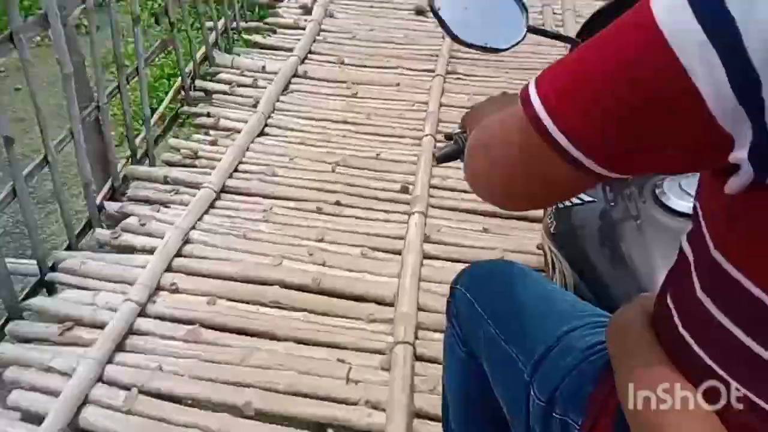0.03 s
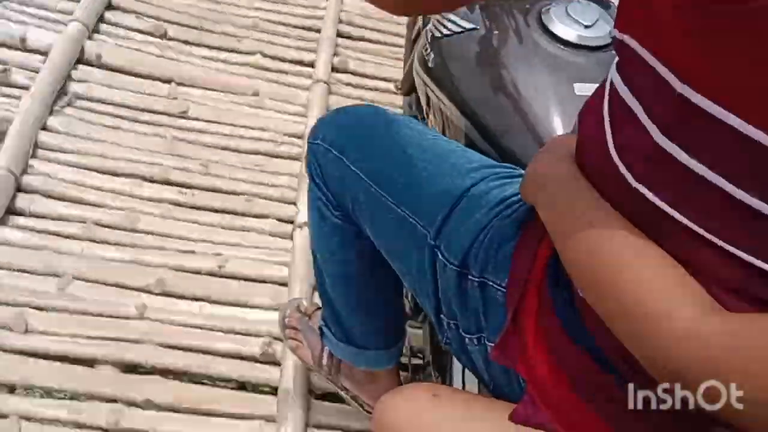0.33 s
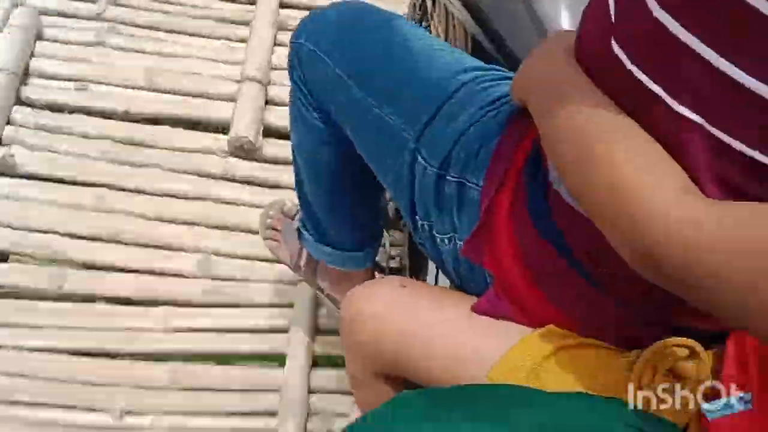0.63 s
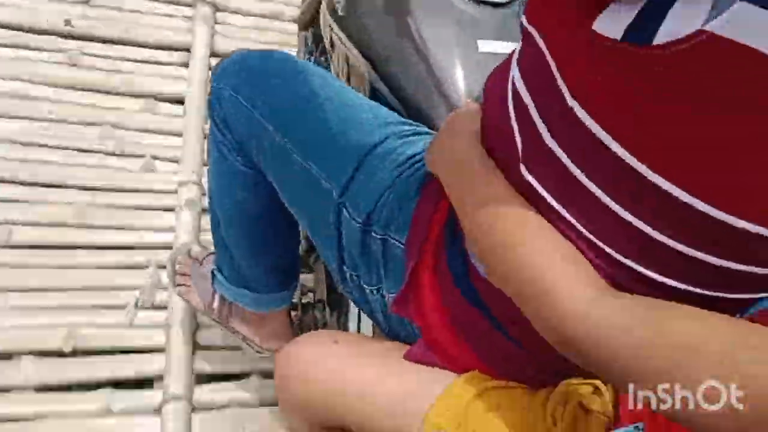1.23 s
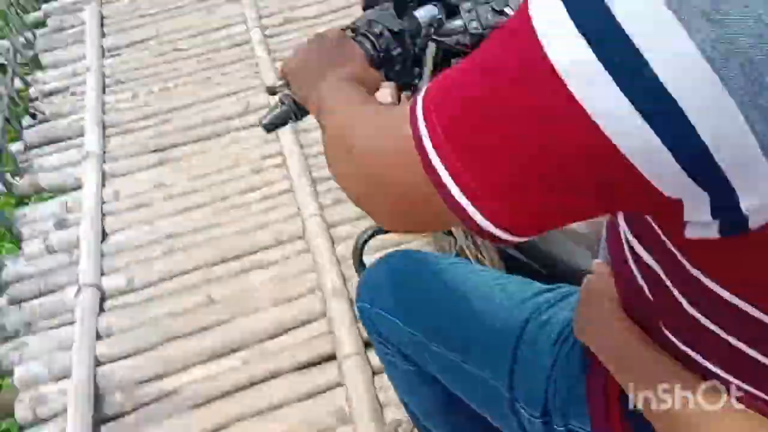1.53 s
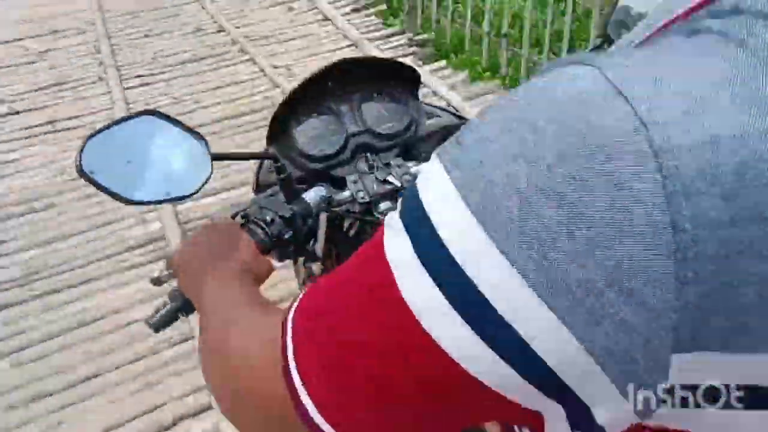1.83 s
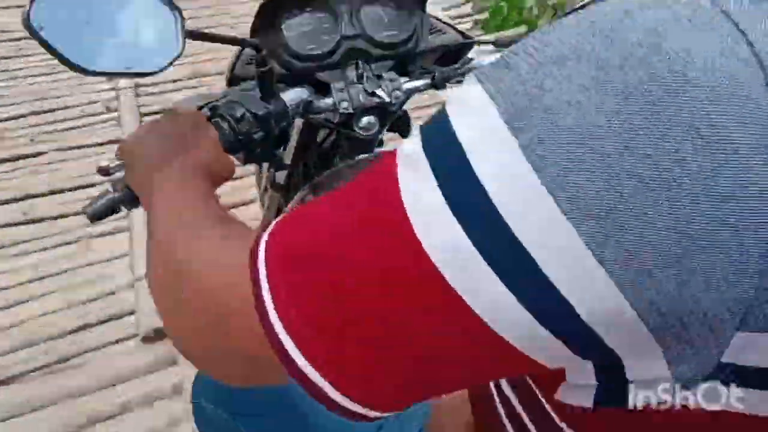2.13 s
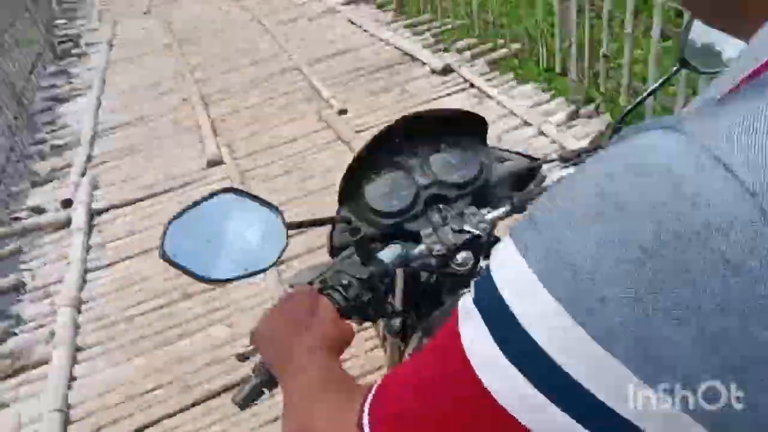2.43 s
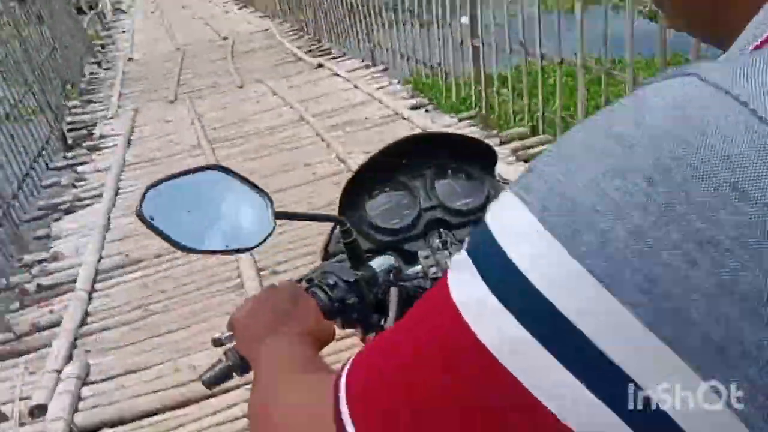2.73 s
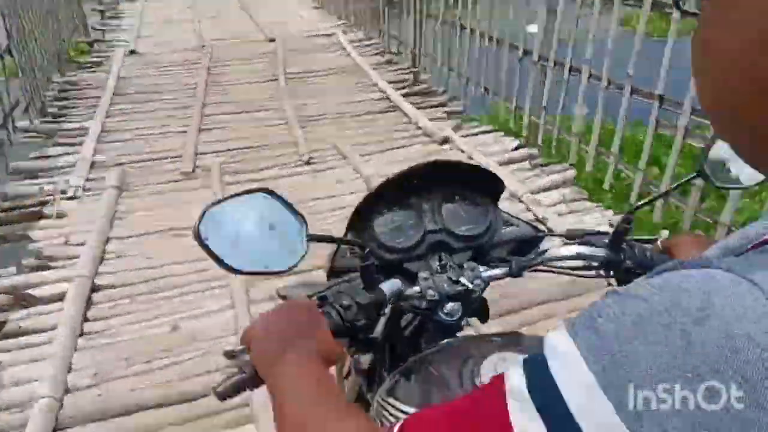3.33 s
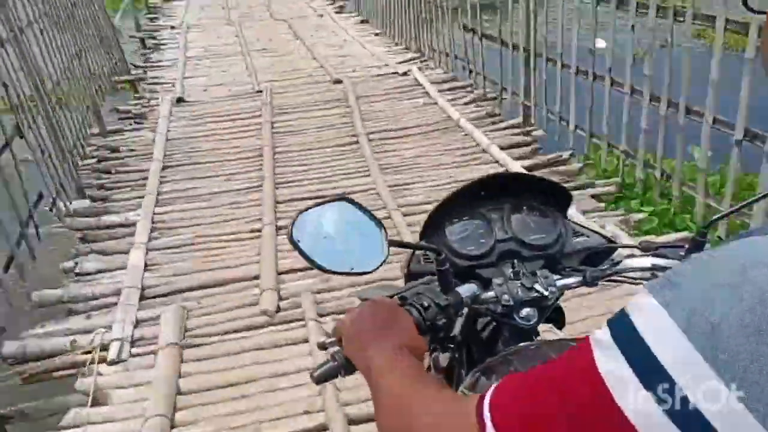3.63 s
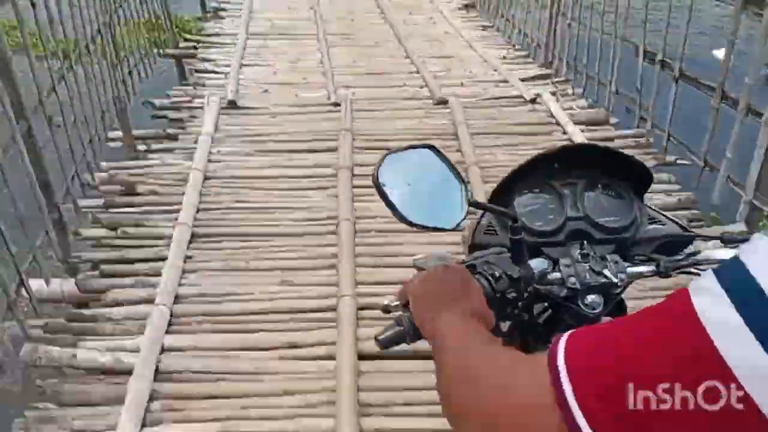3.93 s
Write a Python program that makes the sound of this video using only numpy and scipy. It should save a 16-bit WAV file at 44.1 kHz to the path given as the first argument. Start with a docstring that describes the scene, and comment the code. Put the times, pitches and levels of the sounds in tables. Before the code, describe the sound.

Loose bamboo slats clatter and knock under a slow motorcycle, with wind buffeting the microphone.

```python
"""Loose bamboo slats knock, chatter and crunch under a slow motorcycle crossing a bridge.
Heard from the pillion seat, they come in two dense spells with single clacks between: each impact
excites damped modes of the canes, and bending poles groan as they slip in their lashings.
The engine putters faintly below; after about a second, turbulent wind buffets the microphone."""
import sys
import numpy as np
from scipy import signal
from scipy.fft import rfft, irfft, next_fast_len
from scipy.io import wavfile
from scipy.ndimage import uniform_filter1d, minimum_filter1d, map_coordinates

SR = 44100
rng = np.random.default_rng(int(sys.argv[2]) if len(sys.argv) > 2 else 0)


def log_audio(samples):
    """Write samples as a 16-bit WAV file to the path given in sys.argv[1]."""
    # one column per channel
    frames = np.atleast_2d(samples).T
    # limit to full scale, then quantise
    limited = np.clip(frames, -1, 1)
    pcm = np.round(limited * 32767).astype(np.int16)
    wavfile.write(sys.argv[1], SR, pcm)


N = 176400

# Wind at the microphone. Each row: time in seconds, buffeting and flutter in relative dB.
WIND_LEVELS = [(0.0, -41, -38), (0.17, -47, -36), (0.2, -37, -28), (0.26, -30, -39), (0.52, -33, -25.5),
               (0.56, -41, -42), (0.7, -48, -32), (0.91, -33.5, -30), (0.95, -23, -28.5),
               (1.11, -21.5, -52.5), (1.2, -20, -39), (1.24, -33, -38), (1.31, -10.5, -24),
               (1.38, -28, -24), (1.41, -17, -38), (1.59, -24.5, -26.5), (1.64, -19.5, -7.5),
               (1.69, -17.5, -24), (1.74, -13.5, -9.5), (1.84, -19, -31.5), (1.89, -9, -11),
               (1.93, -19.5, -17), (2.1, -15.5, -14.5), (2.21, -25.5, -18.5), (2.34, -16.5, -25.5),
               (2.39, -31.5, -25.5), (2.53, -26.5, -29.5), (2.64, -20, -25), (2.84, -21, -28),
               (2.99, -36, -31), (3.03, -14.5, -20), (3.1, -12.5, -4.5), (3.14, -13, -22),
               (3.17, -16, -19.5), (3.38, -19.5, -21), (3.52, -20.5, -28), (3.61, -24.5, -19.5),
               (3.66, -4.5, -26), (3.71, -23.5, -27), (3.75, -19.5, -15.5), (3.79, -18, -19.5),
               (3.88, -22.5, -12.5), (3.94, -14.5, -37), (4.0, -27, -37.5)]
# Single eddies. Each row: start in seconds, relative level in dB, pitch in Hz.
EDDIES = [(1.185, -2, 125), (1.311, -18, 143), (1.53, -7.5, 118), (1.62, -0.5, 148), (1.736, -10.5, 189),
          (2.106, -4, 140), (3.039, -4, 75.4), (3.088, 2.5, 225), (3.131, 1, 145), (3.342, -2.5, 95),
          (3.644, 5, 107.4), (3.744, 1, 254)]
# Poles slipping under load. Each row: start in seconds, length in seconds, level in dB, pitch in Hz.
POLE_SLIPS = [(.2, .035, -19, 536), (.364, 0.028, -18, 436), (.43, .1, -17.5, 518.5),
              (1.885, 0.039, -46, 600)]
# Running rattle of the deck. Each row: time in seconds, hollow tone, clack and crunch in relative dB.
RATTLE_LEVELS = [(0.0, -20, -18.5, -37.6), (0.15, -23, -23.5, -26.5), (0.33, -24, -26.5, -41),
                 (0.4, -16.5, -18.5, -33), (0.52, -35, -18.5, -27.5), (0.62, -25, -23.5, -38),
                 (0.76, -17, -18, -22.5), (0.9, -34.5, -30, -43), (1.0, -25, -27, -47),
                 (1.12, -31.5, -33.5, -47), (1.29, -29.5, -33.5, -52.5), (1.42, -26.5, -34.5, -53),
                 (1.56, -32, -31.5, -49), (1.66, -20.5, -26.5, -49), (1.82, -32, -39.5, -58),
                 (1.95, -26.5, -45, -58), (2.07, -40, -37, -53.5), (2.18, -33, -44, -64),
                 (2.29, -18.5, -28.5, -43), (2.42, -34, -37.5, -50), (2.53, -26, -27, -48),
                 (2.58, -18.5, -15, -32), (2.74, -16, -20.5, -30), (2.88, -14.5, -20, -30.5),
                 (2.98, -20.5, -19, -36), (3.03, -23, -28.1, -57), (3.13, -22.5, -39.5, -55),
                 (3.35, -26, -38.5, -53), (3.53, -32.5, -36, -50), (3.8, -26, -33, -50),
                 (3.92, -41, -38.5, -56), (4.0, -35, -29, -40.5)]
# Slats flung against their bearers. Each row: start in seconds, hollow tone, clack and crack
# in relative dB, main note in Hz, settling time in seconds.
SLAT_IMPACTS = [(0.0, -14, -21.8, -16.5, 1624, 0.018), (0.026, -18.5, -16.5, -30.5, 1277, 0.02),
                (0.081, -25, -21.0, -33, 1220, 0.0053), (0.103, -18, -20.5, -30, 1580, 0.0072),
                (0.168, -32, -18.5, -51, 1217, 0.014), (0.184, -23.5, -35, -26.5, 2040, 0.021),
                (0.217, -17.5, -18, -34, 573, 0.028), (0.268, -21.5, -20.5, -30, 1330, 0.02),
                (0.363, -13, -20, -33.5, 523, 0.022), (0.389, -15, -21, -35.5, 534, 0.016),
                (0.428, -18, -22.5, -41, 526, 0.014), (0.45, -23, -19.5, -30, 1620, 0.0099),
                (0.473, -30, -17.5, -59, 1518.0, 0.0061), (0.493, -16, -13, -37.6, 414, 0.016),
                (0.515, -26, -18.5, -41, 1450, 0.007), (0.553, -40, -14, -33, 1683, 0.015),
                (0.578, -24, -22, -24, 1270.0, 0.012), (0.623, -40, -23.5, -41, 1577, 0.023),
                (0.659, -40, -21, -29.5, 1235, 0.0029), (0.675, -21, -22.5, -21, 1260, 0.0078),
                (0.723, -25.5, -22, -34, 2070, 0.007), (0.74, -20, -19.7, -37, 2046.0, 0.018),
                (0.759, -38, -19.5, -43, 1735, 0.013), (0.784, -48, -22, -33.5, 1450, 0.0038),
                (0.842, -25, -18.5, -30, 2045, 0.008), (0.858, -22, -22.3, -34.5, 1870, 0.016),
                (0.916, -30, -27, -58, 1254, 0.01), (0.952, -20, -22, -42.5, 650, 0.026),
                (0.995, -30, -24.0, -48, 1900, 0.005), (1.048, -24, -24.5, -49, 1944, 0.0066),
                (1.083, -30, -27.1, -26, 1647.0, 0.004), (1.15, -25, -25, -32.6, 1757, 0.0097),
                (1.165, -46, -48, -42, 1680, 0.0063), (1.219, -28, -23, -53, 1990, 0.017),
                (1.348, -30, -23.5, -51, 1648, 0.021), (1.374, -24, -27, -50, 1143, 0.01),
                (1.455, -39, -26, -43, 1484, 0.016), (1.481, -22.5, -24.5, -34, 1570, 0.012),
                (1.501, -19.5, -17.5, -35.5, 1567.0, 0.0059), (1.605, -18, -17.5, -45, 1613, 0.016),
                (1.639, -37, -21.5, -60, 1406, 0.017), (1.687, -42.0, -26.5, -49, 1760, 0.017),
                (1.732, -26, -30, -53, 2090, 0.0059), (1.856, -48, -36.5, -49, 1640, 0.0058),
                (1.886, -12.5, -22, -43.5, 610, 0.016), (1.903, -40, -36, -58, 479.0, 0.0038),
                (1.933, -18.5, -26.5, -51.1, 545, 0.017), (2.013, -19, -32, -61, 468.0, 0.018),
                (2.031, -37, -26, -53, 1340, 0.011), (2.1, -24, -27.5, -44, 616, 0.011),
                (2.269, -29.3, -31.5, -40.5, 721.0, 0.021), (2.306, -42.0, -27, -62, 1350, 0.023),
                (2.384, -24.5, -26.5, -42, 595, 0.017), (2.448, -25.5, -19.5, -31.5, 1227, 0.017),
                (2.463, -26, -19.5, -48, 1226, 0.017), (2.545, -23, -21.5, -36.5, 1656, 0.024),
                (2.601, -23.5, -20.5, -39, 1520, 0.024), (2.639, -18.5, -18.2, -39, 943, 0.022),
                (2.709, -18.5, -18, -25.5, 850, 0.023), (2.731, -19, -16.5, -39, 592, 0.011),
                (2.763, -46, -22, -44, 1420, 0.011), (2.842, -37, -41, -34.5, 510, 0.0068),
                (2.924, -21.5, -38, -41.0, 733, 0.023), (3.051, -21, -51, -63, 617, 0.012),
                (3.059, -18.6, -49, -64, 650, 0.016), (3.112, -16, -30.5, -56, 570, 0.015),
                (3.242, -22.5, -31, -46, 804, 0.016), (3.286, -33, -23, -35.5, 1014, 0.015),
                (3.381, -22.5, -30.5, -51, 586, 0.012), (3.455, -28.5, -32.5, -44.5, 464, 0.016),
                (3.618, -17.5, -28, -41, 517, 0.01), (3.644, -17.5, -46, -63, 620, 0.0068),
                (3.678, -21, -23, -36.5, 554, 0.023), (3.73, -35, -22.5, -33.5, 1140, 0.016),
                (3.783, -40, -27, -44.5, 1233, 0.018), (3.806, -20.5, -34, -68, 1230, 0.0069),
                (3.888, -24.5, -28.5, -53.5, 423, 0.0037), (3.925, -35, -37.5, -46.5, 2030, 0.0032),
                (3.955, -25, -29.5, -62, 646, 0.023), (3.98, -22, -26.5, -52, 1270, 0.021)]

# Frequency responses. Each row: frequency in Hz, gain in dB.
EXHAUST_COLOUR = [(25, -39.5), (70, 1), (125, 21), (180, 10.5), (300, 0.5), (600, -7.5), (1500, -30),
                  (6000, -47)]  # the silencer
BUFFET_COLOUR = [(20, -37), (38, -20.5), (55, -16), (80, 0), (125, 0.5), (180, -1), (240, -9), (330, -22.5),
                 (500, -35), (1000, -42.5), (3000, -78)]  # low turbulence
FLUTTER_COLOUR = [(80, -25.5), (160, -3.5), (240, 3.5), (340, 3), (450, -8), (700, -13), (1100, -37.5),
                  (2500, -52), (6000, -75), (12000, -86.5)]  # higher turbulence
PORT_COLOUR = [(15, -28), (40, -14.5), (60, -7.5), (85, 3.5), (400, -3)]  # the microphone port struck by an eddy
HOLLOW_COLOUR = [(120, -33.5), (260, -8), (430, 2), (580, -2.5), (760, -4), (950, -5.5), (1400, -6.5)]  # a cane's tube
CLACK_COLOUR = [(500, -43), (900, -5), (1250, 5.5), (1600, 4), (2100, 0.5), (2500, -5), (3000, -14),
                (4500, -13.5)]  # a slat's clack
CRUNCH_COLOUR = [(1500, -15.5), (2700, 5.5), (3050, -1), (3700, 4.5), (4200, 1), (4600, 4), (5100, -9),
                 (6500, -13), (7200, -10), (8400, -7.5), (9200, -19.5), (10000, -33), (11400, -40),
                 (12500, -46.5), (16000, -51)]  # slats rubbing
CRACK_COLOUR = [(1500, -13.5), (2800, 6), (4400, 5), (5400, -3), (6500, -4.5), (8400, -4.5), (9200, -11.5),
                (10200, -27), (11400, -28), (12500, -39.5), (16000, -46)]  # a flung slat's dry crack

HOLLOW_T60, CLACK_T60, CRACK_T60, NOTE_T60 = 0.055, 0.03, 0.015, 0.059  # seconds to decay by 60 dB
LOAD_RISE_S, TOUCH_S = 0.0025, 0.00036  # a slat takes the load; softness of a contact
SHORTER_POLES_S = (1.53, 2.56)  # over this span long, deep poles give way to shorter ones


def amp(db):
    """Decibels to gain."""
    return 10 ** (np.asarray(db) / 20)


def unit(x):
    """Scale to rms 1."""
    return x / np.sqrt(np.mean(x ** 2) + 1e-20)


def wobble(rate):
    """A smooth random curve, rate knots a second."""
    return map_coordinates(rng.standard_normal(2048), [np.arange(N) * rate / SR], mode="wrap")


def curves(rows):
    """Linear interpolation of each column after the time, one value per sample."""
    times, *columns = np.transpose(rows)
    return [np.interp(np.arange(N) / SR, times, column) for column in columns]


def add(track, start_s, sound):
    """Superpose a sound on a track."""
    i = int(np.clip(start_s * SR, 0, N - 1))
    track[i:i + len(sound)] += sound[:N - i]


def body(colour, size=4096):
    """Minimum-phase impulse response of a colour, by folding its cepstrum."""
    hz, db = np.transpose(colour)
    log_hz = np.log(np.fft.rfftfreq(size, 1 / SR) + 1)
    cepstrum = irfft(np.log(amp(np.interp(log_hz, np.log(hz), db))))
    cepstrum[1:size // 2] *= 2
    cepstrum[size // 2 + 1:] = 0
    return irfft(np.exp(rfft(cepstrum)))


def through(x, response):
    """Convolve x with an impulse response."""
    return signal.fftconvolve(x, response)[:len(x)]


def engine(firing_hz=27.68, level_db=-49):
    """Source and filter: the pulse train of one slow cylinder is shaped by its silencer."""
    cycles = np.cumsum(firing_hz * (1 + .04 * wobble(3))) / SR
    firings = np.diff(np.floor(cycles), prepend=0) * amp(6 * wobble(27))
    return amp(level_db) * unit(through(firings, body(EXHAUST_COLOUR)))


def turbulence(colour):
    """Random pressure fluctuation: coloured noise of rms 1, partly evened out in strength."""
    pressure = unit(through(rng.standard_normal(N), body(colour)))
    local_power = np.abs(uniform_filter1d(pressure ** 2, size=1800))
    return unit(pressure / np.sqrt(local_power + 0.28))


def wind(eddy_rise_s=0.0092):
    """Turbulent pressure buffets and flutters at the microphone; single eddies thump its port."""
    buffet_db, flutter_db = curves(WIND_LEVELS)
    buffet = amp(buffet_db - 1.5) * turbulence(BUFFET_COLOUR)
    flutter = amp(flutter_db - 3.5) * turbulence(FLUTTER_COLOUR)
    thumps, t = np.zeros(N), np.arange(SR // 10) / SR
    swell = (t / eddy_rise_s) ** 2
    for start_s, db, hz in EDDIES:
        add(thumps, start_s, amp(db - 4) * swell * np.exp(1 - swell) * np.sin(2 * np.pi * hz * t))
    return buffet + flutter + through(thumps, body(PORT_COLOUR))


def groans():
    """Friction: a bending pole slips in its lashing and sounds one rough, low note."""
    out = np.zeros(N)
    for start_s, length_s, db, hz in POLE_SLIPS:
        t = np.arange(int(2 * length_s * SR)) / SR
        phase = 2 * np.pi * np.cumsum(hz * (1 + 0.049 * wobble(170)[:len(t)])) / SR
        envelope = (1 - np.exp(-t / 0.0048)) / (1 + (t / length_s) ** 8)
        roughness = amp(1.9 * wobble(120)[:len(t)])
        add(out, start_s, amp(db) * envelope * roughness * np.sin(phase))
    return out


def contacts(times, strengths, band_hz, t60, length, modes=3):
    """Free vibration: each contact excites damped modes of a cane of random size."""
    t = np.arange(int(1.3 * t60 * SR), dtype=np.float32) / SR
    hz = rng.uniform(*band_hz, (len(times), modes, 1)).astype(np.float32)
    sign = rng.choice([-1, 1], hz.shape).astype(np.float32)
    envelope = (1 - np.exp(-t / TOUCH_S)) * amp(-60 * t / t60)
    rings = (sign * np.sin(2 * np.pi * hz * t)).sum(1) * envelope * strengths[:, None]
    samples = (times * SR).astype(int)[:, None] + np.arange(len(t))
    return np.bincount(samples.ravel(), rings.ravel(), length)[:length]


def rattle(band_hz, t60, colour, spread_db, count):
    """Incoherent superposition: random contacts merge into a steady rattle of rms 1."""
    times = (np.arange(count) + rng.uniform(0, 2, count)) / count * N / SR
    strengths = amp(spread_db * np.clip(rng.standard_normal(count), -2, 2))
    return unit(through(contacts(times, strengths, band_hz, t60, N), body(colour)))


def deck():
    """Many slats chatter and rub under the wheels; the shorter poles farther on resonate higher."""
    hollow_db, clack_db, crunch_db = curves(RATTLE_LEVELS)
    jolt_db = wobble(40)
    short_share = np.interp(np.arange(N) / SR, SHORTER_POLES_S, [0, 1])
    long_poles = rattle((365, 903), HOLLOW_T60, HOLLOW_COLOUR, spread_db=1.5, count=600)
    short_poles = rattle((523, 1067), HOLLOW_T60, HOLLOW_COLOUR, spread_db=1, count=600)
    poles = np.sqrt(1 - short_share) * long_poles + np.sqrt(short_share) * short_poles
    clacks = rattle((856, 3356), CLACK_T60, CLACK_COLOUR, spread_db=2.5, count=2100)
    flicker_db = 2.1 * wobble(110)
    crunch = rattle((2400, 13960), CRACK_T60, CRUNCH_COLOUR, spread_db=2.5, count=8500)
    return amp(jolt_db) * (amp(hollow_db - 4.5) * poles + amp(clack_db - 2.5) * clacks
                           + amp(crunch_db - 3 + flicker_db) * crunch)


def rebounds(band_hz, t60, settle_s, response, count, modes):
    """Inelastic rebounds: a burst of contacts swells and settles, with the energy of 30 ms at rms 1."""
    age = (np.arange(count) + rng.uniform(0, 1, count)) / count * 3  # in settling times
    loading = 1 - np.exp(-age * settle_s / LOAD_RISE_S)
    strengths = loading * np.exp(-age) * amp(rng.normal(0, 1.77, count))
    times = (age - age[0]) * settle_s
    burst = through(contacts(times, strengths, band_hz, t60, SR // 6, modes), response)
    return burst / np.sqrt(np.sum(burst ** 2) / (.03 * SR) + 1e-20)


def knocks():
    """Impact excitation: a slat hits its bearer with a main note, a hollow tone, a clack and a crack."""
    out = np.zeros(N)
    hollow_body = body(HOLLOW_COLOUR, size=2048)
    clack_body = body(CLACK_COLOUR, size=1024)
    crack_body = body(CRACK_COLOUR, size=512)
    for start_s, hollow_db, clack_db, crack_db, hz, settle_s in SLAT_IMPACTS:
        note_db = hollow_db if hz < 900 else clack_db  # low notes belong to the tube
        note = rebounds((.97 * hz, 1.03 * hz), NOTE_T60, settle_s, [1.], count=6, modes=1)
        hollow = rebounds((284, 1003), HOLLOW_T60, settle_s, hollow_body, count=10, modes=2)
        clack = rebounds((846, 3410), CLACK_T60, settle_s, clack_body, count=22, modes=3)
        crack = rebounds((2214, 14000), CRACK_T60, settle_s, crack_body, count=26, modes=10)
        add(out, start_s, amp(note_db - 3) * note + amp(hollow_db - 2.5) * hollow
            + amp(clack_db - 2) * clack + amp(crack_db - 1.5) * crack)
    return out


def scene(scatter_db=-17, scatter_t60=0.085):
    """Superposition of the bamboo, its brief scattering from deck and railings, engine and wind."""
    bamboo = knocks() + deck() + groans()
    t = np.arange(SR // 3) / SR
    tail = rng.standard_normal(len(t)) * amp(-60 * t / scatter_t60) * (t > .004)
    scatter = amp(scatter_db) * through(bamboo, tail / np.linalg.norm(tail))
    return (bamboo + scatter + engine() + wind())[None]


def record(dry, ceiling=.88, cutoff_hz=15800):
    """Peak limiting: a smoothed gain ducks the peaks, then a low-pass filter cuts the top."""
    needed_gain = np.minimum(1, ceiling / (np.abs(dry) + 1e-9))
    limited = dry * uniform_filter1d(minimum_filter1d(needed_gain, size=400), size=300)
    size = next_fast_len(N + SR // 4)
    passband = np.fft.rfftfreq(size, 1 / SR) < cutoff_hz
    return irfft(rfft(limited, size) * passband, size)[:, :N]


dry = scene()
out = record(dry)
log_audio(out)
```